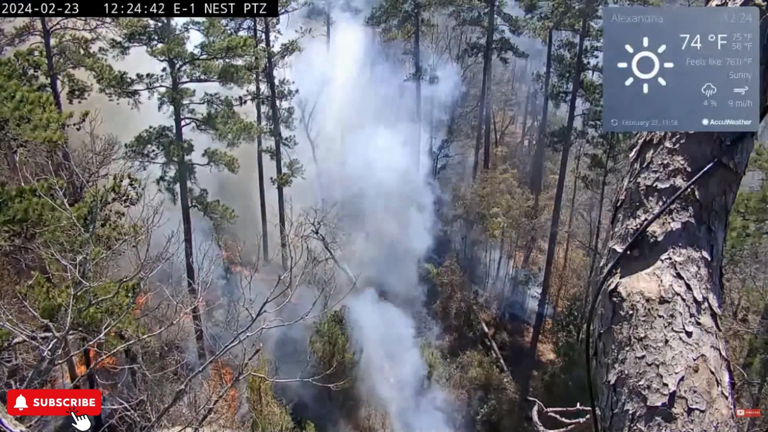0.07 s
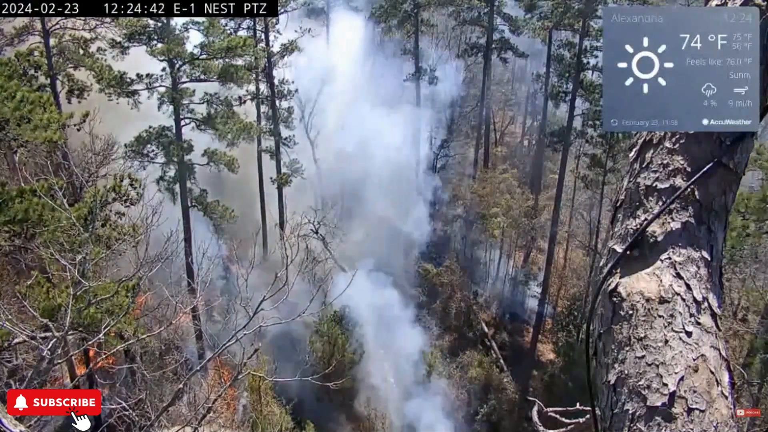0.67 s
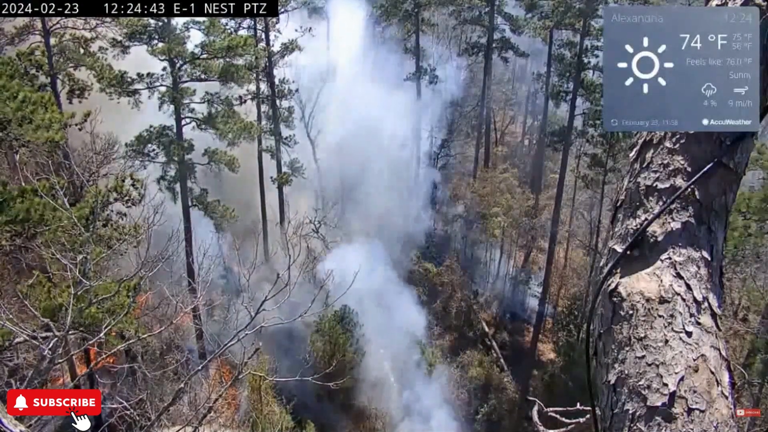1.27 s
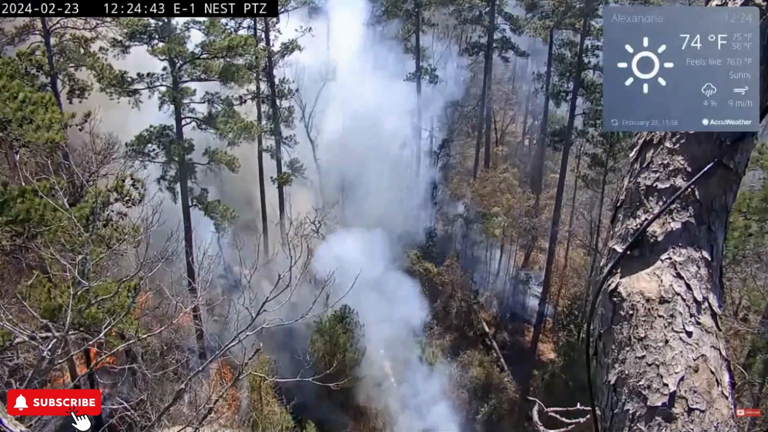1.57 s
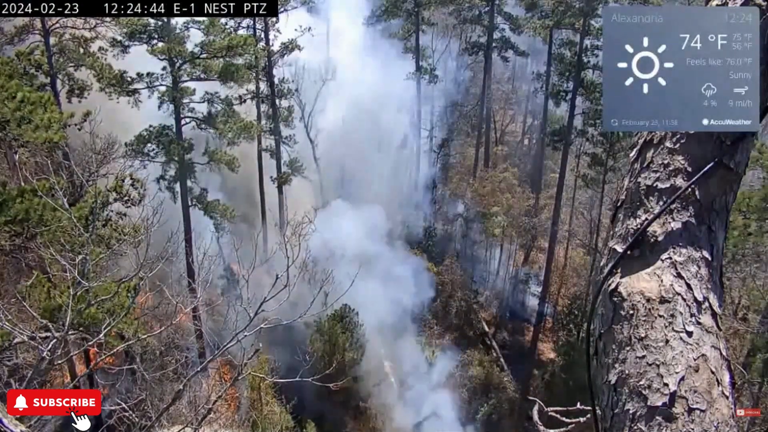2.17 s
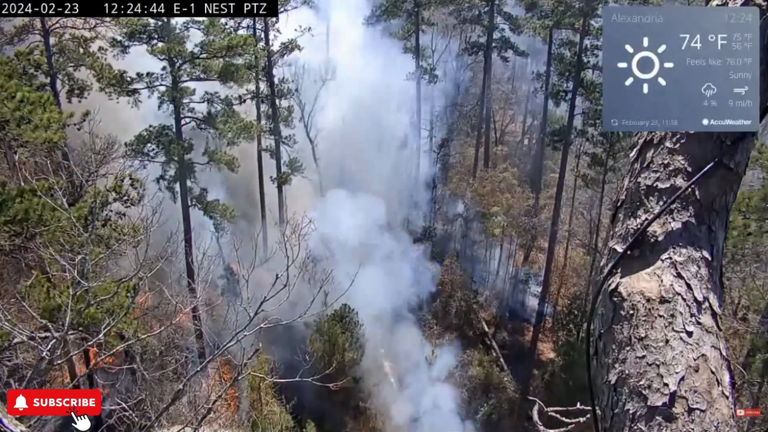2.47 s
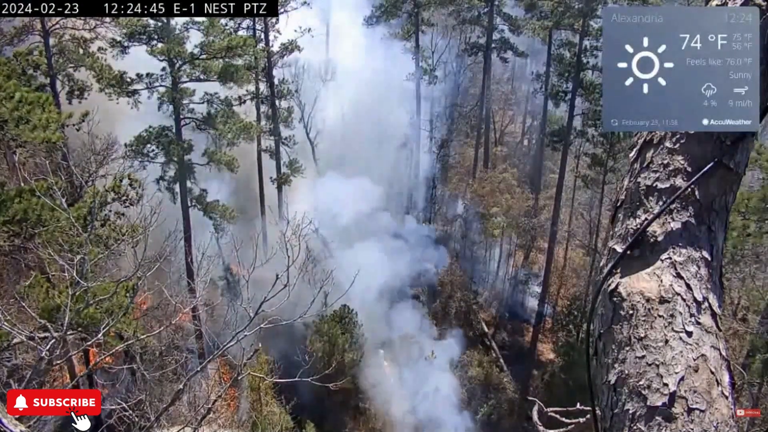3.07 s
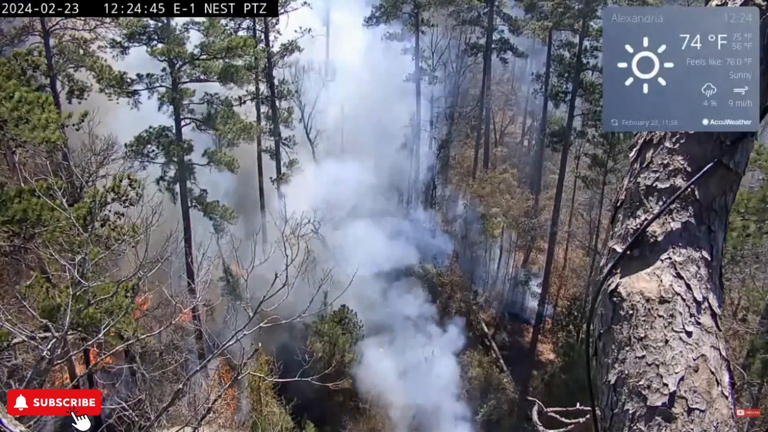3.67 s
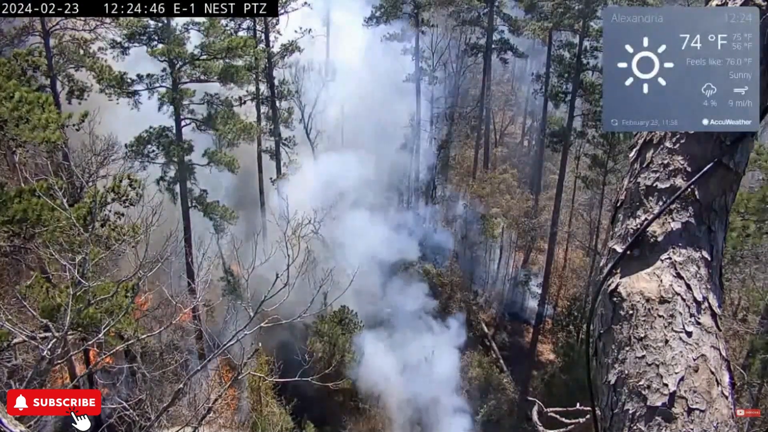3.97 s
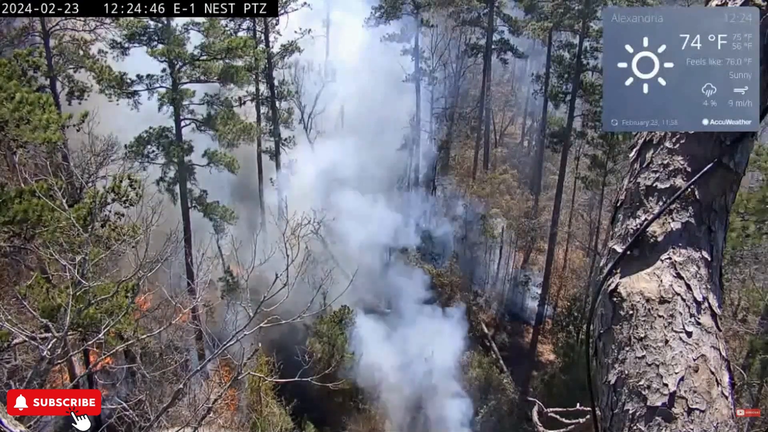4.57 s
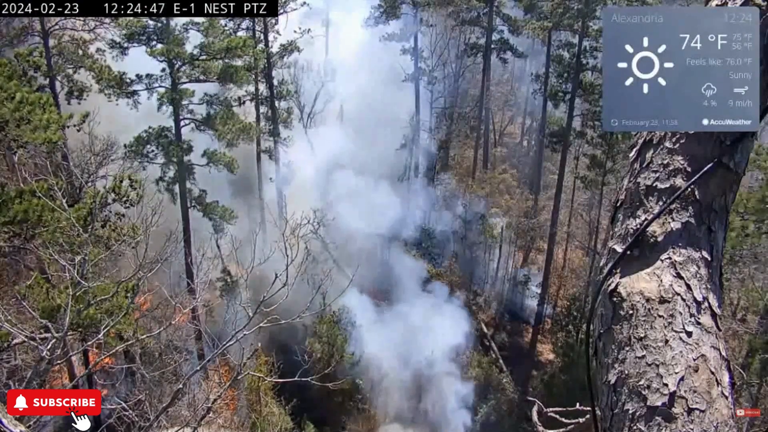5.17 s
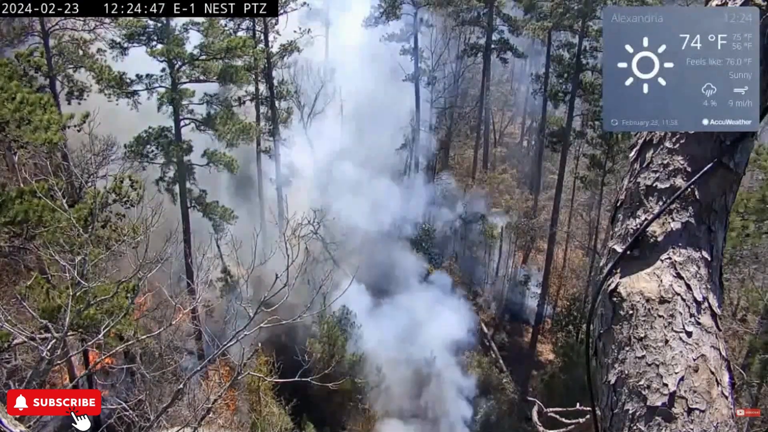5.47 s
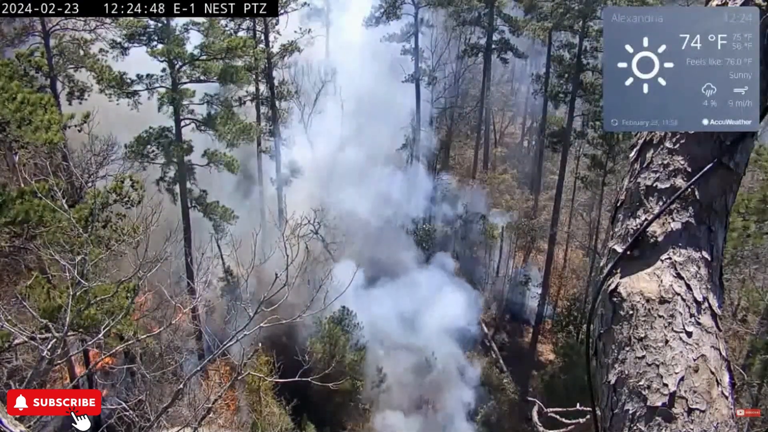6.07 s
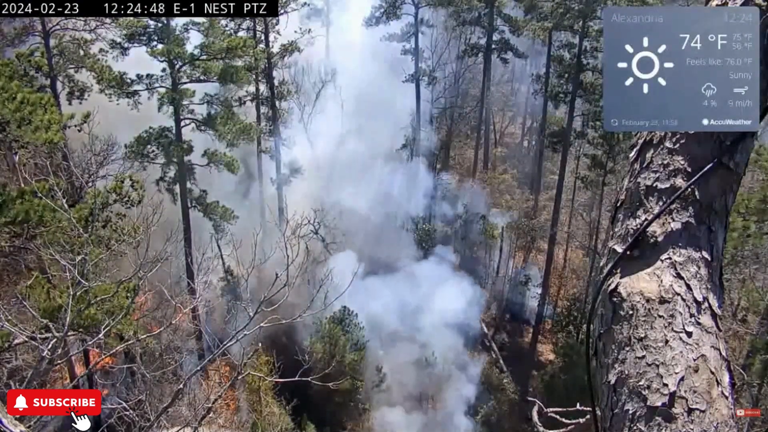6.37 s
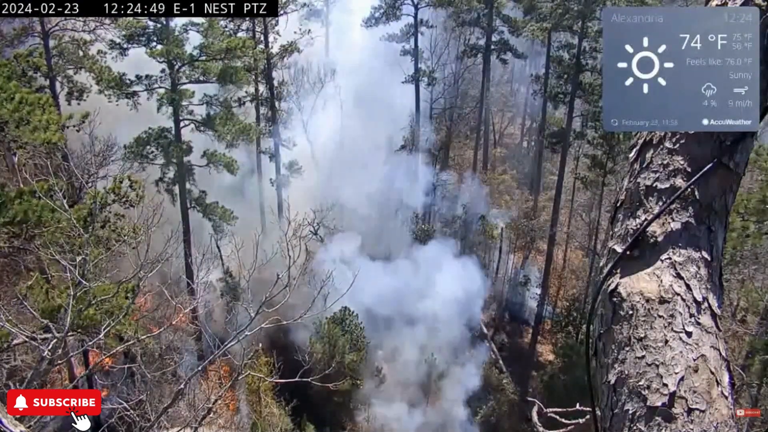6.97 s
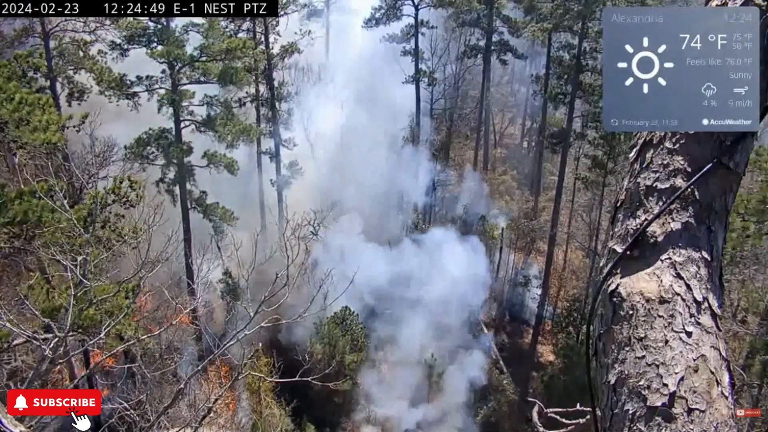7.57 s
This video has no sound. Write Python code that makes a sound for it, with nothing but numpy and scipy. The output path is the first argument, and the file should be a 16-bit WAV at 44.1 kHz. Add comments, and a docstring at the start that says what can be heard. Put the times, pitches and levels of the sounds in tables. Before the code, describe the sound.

A ground fire burns through a pine wood, heard from one fixed outdoor microphone. Needles crackle continuously and twigs split in sharp, irregular pops with a slight echo off the trunks. Beneath lies a steady bed of hiss, rushing air and low wind rumble. Early on, sap steam whistles very faintly and a distant engine drones. The drone sinks midway, just before the biggest pops, and returns near the end.

```python
"""A ground fire creeps through a pine wood, heard from one fixed outdoor microphone.
From the start, steam splits twigs in sharp pops over crackling needles, all scattered by the trunks,
on a bed of hiss, rushing air and the rumble of wind and flames. Early on, sap steam whistles faintly
and a far engine drones. Near 4 s the drone sinks away and the biggest pops land just after;
towards the end a few more tufts flare and the wind brings the drone back."""
import sys
import numpy as np
from scipy import signal
from scipy.fft import rfft, irfft, next_fast_len
from scipy.io import wavfile
from scipy.ndimage import uniform_filter1d

SR = 44100
rng = np.random.default_rng(int(sys.argv[2]) if len(sys.argv) > 2 else 0)


def file_out(sig):
    """Save sig as 16-bit WAV at sys.argv[1]."""
    # one column per channel
    cols = np.atleast_2d(sig).T
    # limit, then scale
    lim = np.clip(cols, -1, 1)
    pcm = np.round(lim * 32767).astype(np.int16)
    wavfile.write(sys.argv[1], SR, pcm)


N = 345303
TIME = np.arange(N) / SR

# foreground pops: t/s, level/dB (over 1 ms, before EQ), ring f/Hz, width/octaves, splinters vs crack/dB
TWIG_POPS = [(.138, -35, 2800, 0.82, -1), (0.2763, -30.5, 7540, 0.55, -5), (0.3107, -31, 2300, 0.46, -3),
             (.5091, -31, 3000, 0.41, -2), (.6211, -30, 5300, 0.65, -4), (0.6749, -25, 3700, 0.31, 0),
             (0.819, -30.5, 2800, 0.34, -4), (.92, -29, 2400, 0.76, 4), (1.0718, -25.5, 5640, 0.57, -6),
             (1.1744, -24.5, 2470, 0.63, -9), (1.2285, -26.5, 3900, .71, -3), (1.6138, -27, 2300, 0.62, 4),
             (1.7697, -27, 3140, .62, 0), (1.9226, -28.5, 4500, 0.74, -3), (1.951, -27, 4000, 0.94, 1),
             (2.1105, -27, 5600, 0.77, -2), (2.1398, -32, 2720, 0.34, -3), (2.2827, -20, 2900, 0.24, -3),
             (2.4268, -26.5, 1300, 0.74, -1), (2.446, -28, 7100, .25, -7), (2.4717, -23.5, 4300, 1, 1),
             (2.4762, -28, 2600, 0.55, 2), (2.6075, -29.5, 4700, 1, -5), (2.8154, -31.5, 5300, 0.54, -4),
             (2.9775, -24, 1100, 0.54, -5), (2.9788, -29, 7560, 0.27, 0), (3.001, -25, 6670, 0.48, -6),
             (3.4226, -26.5, 3480, 0.1, 4), (3.424, -24.5, 6940, 0.14, 4), (3.486, -26.5, 1350, 1, -10),
             (3.6103, -25.5, 2700, 1, 5), (3.7298, -21.5, 3200, 0.56, 5), (3.9894, -25, 1450, 1, -1),
             (4.0219, -27.5, 4800, 0.54, -6), (4.0324, -31.5, 2300, 0.94, -1),
             (4.0517, -26.5, 2290, .81, 3), (4.1124, -24.5, 4040, .32, -13),
             (4.2302, -30.5, 4400, 0.58, -1), (4.257, -29, 4000, 0.63, 1), (4.393, -19.5, 2900, 0.6, -3),
             (4.4, -37, 4000, 0.86, -3), (4.4717, -28, 4430, 0.42, -15), (4.5123, -29, 3900, 0.4, -6),
             (4.557, -28, 3700, 0.51, -2), (4.606, -19, 3600, 0.45, 0), (4.617, -34, 2800, .4, -2),
             (4.6223, -29, 2750, .25, -1), (4.6458, -26.5, 2600, 0.79, 4), (4.6678, -30, 2780, 0.41, 0),
             (4.7365, -35, 3900, .5, -3), (4.813, -22, 2480, 0.52, -2), (4.8884, -23.5, 3000, 0.7, -7),
             (5.0254, -23, 4140, 0.37, -7), (5.2682, -24, 2880, 1, 5), (5.515, -30.5, 3800, .55, -1),
             (5.6074, -27, 3860, 0.2, 0), (5.6263, -23, 4500, 0.92, 3), (5.6371, -28, 4000, 0.54, 1),
             (5.7262, -30, 4000, .6, -7), (5.762, -22, 1940, 0.55, 5), (5.781, -27.5, 2600, 1, 5),
             (6.0742, -30.5, 3200, 0.54, -1), (6.1336, -21, 4300, 0.47, -3), (6.1871, -30, 3900, 0.47, -3),
             (6.2583, -19.5, 1640, 0.58, -8), (6.3844, -33, 2700, 0.17, -2), (6.4144, -24, 2250, 0.58, -7),
             (6.566, -29, 2170, 0.34, -7), (6.749, -32, 4000, .6, 1), (6.809, -25.5, 2390, .7, 1),
             (6.8175, -33, 4100, .7, -2), (6.972, -33, 3600, .5, 0), (6.996, -22, 8050, 0.55, -4),
             (7.2257, -28, 6000, .7, 3), (7.247, -32, 2800, 0.35, -3), (7.253, -31, 2880, 0.24, -2),
             (7.289, -28, 5100, 0.45, 3), (7.5356, -32, 3400, 0.63, -10), (7.667, -32, 5200, 0.54, -3),
             (7.718, -26, 7400, 0.27, -12), (7.7268, -24, 1500, 0.61, 1)]
# tufts of needles catching: t/s, level/dB (before EQ)
TUFT_FLARES = [(.258, -38.5), (1.255, -42), (1.48, -43), (1.715, -40.5), (2.926, -37.5), (5.717, -41.5),
               (5.87, -43), (6.803, -45), (7.241, -46)]
# vigour of the flames, a fader that crackle, rush and hiss partly follow: t/s, level/dB
FLAME_VIGOUR = [(0, 0.5), (1.3, 0.7), (2.3, -1.5), (3.2, -1.8), (4.6, -0.3), (5.2, -1.7), (5.9, -1.5),
                (6.6, 0.5), (7.83, -2)]
# sap steam jets: start t/s, length/s, starting f/Hz, rise/(Hz per s), starting level/dB
STEAM_JETS = [(.18, 0.28, 9560, 3000, -55), (.8, .18, 10150, 600, -60), (2.33, .2, 11550, 1600, -58),
              (3.1, .25, 12250, 1100, -60)]
# EQ of the needle crackle: f/Hz, level/dB
CRACKLE_EQ = [(300, -14), (900, 13), (2400, 4), (4500, 0.5), (8300, 2.5), (12000, 6.5)]
# EQ of the far burn's hiss: f/Hz, level/dB
HISS_EQ = [(800, -28), (1900, -2), (2400, 6), (2750, -2), (3200, 3.5), (4300, 5), (5800, 1), (6700, 4),
           (8500, 1.5), (10000, -2.5), (14000, -3)]
# EQ of the rushing air: f/Hz, level/dB
RUSH_EQ = [(150, -23), (300, -3.5), (480, -0.5), (750, -2.5), (1000, -5.5), (1450, -6.5), (1900, -13),
           (3000, -13), (6000, -35)]
# EQ of the wind and flame rumble: f/Hz, level/dB
RUMBLE_EQ = [(15, -16), (25, -13), (45, -4.5), (65, -1.1), (80, 3), (100, 1), (125, 0.1), (160, -4),
             (200, -9.5), (250, -17), (330, -24.5), (500, -54)]
# gusts riding the rumble: t/s, level/dB
RUMBLE_GUSTS = [(0, -2.3), (1.3, 0.6), (2.4, -2.3), (3.7, -1.4), (4.4, 0), (5.3, -2.2), (5.85, 0.7),
                (6.4, -1.1), (7.83, -0.5)]
# turning rate of the far engine: t/s, f/Hz
ENGINE_RATE = [(0, 20.5), (1.1, 20.46), (1.8, 20.68), (2.5, 20.6), (3.2, 20.66), (4, 20.5), (7.83, 20.28)]
# the drone as the wind carries it: t/s, 4th harmonic level/dB, 5th harmonic level/dB
DRONE_LEVELS = [(0, -39, -40), (.3, -31, -31.5), (.6, -33.5, -29.5), (.9, -35, -31.5), (1.27, -29.5, -36),
                (1.55, -36, -34.5), (1.85, -30.5, -32.5), (2.15, -32, -38), (2.4, -37.5, -36.5),
                (2.75, -44, -32), (3.1, -39, -35), (3.35, -38.5, -30.5), (3.75, -39.5, -32.5),
                (4.2, -59, -42), (6.4, -52, -47), (6.85, -33, -41), (7.35, -49, -51), (7.65, -46, -34.5)]
# treble lost in the air between fire and microphone: f/Hz, level/dB
AIR_EQ = [(8500, -1), (11000, -5.5), (14000, -6)]
# the microphone's dull top end: f/Hz, level/dB
MICROPHONE_EQ = [(8400, 0.5), (9800, -3.5), (11000, -8), (14000, -13), (15000, -32)]


def twig_pops(bass_spread=1.1, mode_ratios=(0.91, 1.09), ring_s=.0011):
    """Pockets of steam split the nearest twigs: some break clean, some splinter and ring."""
    start, db, hz, width, splinter_db = np.transpose(TWIG_POPS)
    width = np.maximum(width, .12)
    cracks = snaps(hz, bass_spread * width, width, splinter_db, splinter_s=.001, skirt_db=-24)
    age = np.arange(cracks.shape[1]) / SR
    bending_modes = sum(np.cos(2 * np.pi * ratio * hz[:, None] * age) for ratio in mode_ratios)
    rings = unit_rows(bending_modes * np.sqrt(age) * np.exp(-age / ring_s))
    ring_db = -9 - 20 * width  # the broader the crack, the less the twig rings
    hits = unit_rows(cracks + undb(ring_db)[:, None] * rings)
    track = place(start, hits * np.sqrt(SR / 1000) * undb(db)[:, None])
    return eq(track, [(200, -27), (660, 0.5)])  # thin wood radiates no bass


def snaps(ring_hz, octaves_below, octaves_above, splinter_db, splinter_s, skirt_db, size=512):
    """Wood breaks: a sharp crack around a ring pitch, then a splinter tail. One unit-energy row a snap."""
    f = np.maximum(np.fft.rfftfreq(size, 1 / SR), 20)
    octaves = np.log2(f / ring_hz[:, None])
    off_pitch = np.maximum(-octaves / octaves_below[:, None], octaves / octaves_above[:, None])
    # the twig's own band stands on the faint, broad skirt of the break itself
    band = np.exp(-(off_pitch / 2) ** 1.5)
    skirt = undb(skirt_db) * f / (f + 1000) / (1 + (f / 9000) ** 4)
    # minimum phase for a hard attack: the whole band starts at once
    cepstrum = irfft(np.log(band + skirt))
    cepstrum[:, 1:size // 2] *= 2
    cepstrum[:, size // 2 + 1:] = 0
    spectrum = np.exp(rfft(cepstrum))
    age = np.arange(size) / SR
    shreds = rng.standard_normal((len(ring_hz), size)) * np.sqrt(age) * np.exp(-age / splinter_s)
    crack = unit_rows(irfft(spectrum))
    splinters = unit_rows(irfft(spectrum * rfft(shreds)))
    return unit_rows(crack + undb(splinter_db)[:, None] * splinters)


def tuft_flares(centre_hz=3530, width_octaves=0.72, run_s=.021, ticks_each=7):
    """A tuft catches: a quick run of soft, splintery ticks."""
    breadth, pitch, lag = rng.random((len(TUFT_FLARES) * ticks_each, 3)).T
    start, db = np.repeat(TUFT_FLARES, ticks_each, axis=0).T
    hz = centre_hz * 2 ** (pitch - .5)
    width = width_octaves * (.5 + breadth)
    ticks = snaps(hz, width, width, splinter_db=np.full(len(hz), 4.), splinter_s=0.0022, skirt_db=-36)
    gain = undb(db) * np.sqrt(run_s * SR / ticks_each)
    return place(start + run_s * lag, ticks * gain[:, None])


def needle_crackle(scatter_db=7.5, ceiling_db=18, centre_hz=2610, range_octaves=1.76, count=5200):
    """Needles burst all over the fire in flurries: many tiny ticks, few big ones, each at its own pitch."""
    when, rank, pitch, breadth, shred = rng.random((count, 5)).T
    octaves = range_octaves * (2 * np.sqrt(pitch) - 1)  # high ticks are the commonest
    flurry_db = .7 * np.tanh(drift(30))[(when * N).astype(int)]
    gain = undb(flurry_db - scatter_db * np.log(1 - rank))
    ceiling = undb(ceiling_db + 8 * np.minimum(octaves, .5))  # low ticks come from afar and stay softer
    gain = ceiling * np.tanh(gain / ceiling)  # a needle holds only so much steam
    width = 0.35 * (.5 + breadth)
    splinter_db = 4.5 + 10 * (shred - .5)
    ticks = snaps(centre_hz * 2 ** octaves, width, width, splinter_db, splinter_s=0.0014, skirt_db=-20)
    return unit_rms(eq(place(when * N / SR, ticks * gain[:, None]), CRACKLE_EQ))


def trunk_echoes(x, wet_db, t60_s, count=90):
    """Trunks and ground add a thin spray of echoes to the direct sound."""
    delay_s = .004 + .16 * rng.random(count) ** 2
    taps = rng.standard_normal(count) * np.exp(-np.log(1000) * delay_s / t60_s)
    response = np.bincount((delay_s * SR).astype(int), taps)
    return x + undb(wet_db) * signal.fftconvolve(x, response / np.linalg.norm(response))[:N]


def steam_whistles(wobble_depth_hz=169, edge_s=.04, fade_db_per_s=12):
    """Sap steam squeezes out of split stems in thin, unsteady jets; each climbs in pitch as it fades."""
    wobble_hz = wobble_depth_hz * drift(900)
    flutter_db = 3 * drift(90)
    track = np.zeros(N)
    for start, length, hz, rise, db in STEAM_JETS:
        age = np.clip(TIME - start, 0, length)
        gate = np.clip(np.minimum(age, length - age) / edge_s, 0, 1)
        phase = 2 * np.pi * np.cumsum(hz + rise * age + wobble_hz) / SR
        track += gate * undb(db - fade_db_per_s * age + flutter_db) * np.sqrt(2) * np.sin(phase)
    return track


def turbulence(curve, db, flutter_db, flutter_hz):
    """Churning air: a noise bed shaped by an EQ curve, its level fluttering."""
    bed = unit_rms(eq(rng.standard_normal(N), curve))
    return bed * undb(db + flutter_db * drift(flutter_hz))


def far_engine(harmonics=(4, 5), rate_wander=0.00048, waver_db=0.6):
    """Only two low harmonics of the turning rate carry this far; each swells and sinks in the wind."""
    rate_hz = automation(ENGINE_RATE) * (1 + rate_wander * drift(1.82))
    turn = 2 * np.pi * np.cumsum(rate_hz) / SR
    times, *levels = np.transpose(DRONE_LEVELS)
    drone = np.zeros(N)
    for harmonic, db in zip(harmonics, levels):
        swell = undb(np.interp(TIME, times, db) + waver_db * drift(3.04))
        drone += np.sqrt(2) * swell * np.sin(harmonic * turn + 2 * np.pi * rng.random())
    return drone


def undb(db):
    """Decibels to gain."""
    return 10 ** (np.asarray(db) / 20)


def unit_rms(x):
    """Normalise to rms 1."""
    return x / np.sqrt(np.mean(x ** 2))


def unit_rows(x):
    """Normalise each row to energy 1."""
    return x / np.linalg.norm(x, axis=1, keepdims=True)


def eq(x, curve):
    """Filter through a curve of f/Hz, level/dB points."""
    hz, db = np.transpose(curve)
    size = next_fast_len(N)
    f = np.maximum(np.fft.rfftfreq(size, 1 / SR), 1)
    gain = undb(np.interp(np.log(f), np.log(hz), db))
    return irfft(rfft(x, size) * gain, size)[:N]


def automation(points):
    """Straight ramps between t/s, value points."""
    return np.interp(TIME, *np.transpose(points))


def drift(rate_hz):
    """Random modulator: sample-and-hold, slewed twice, at rms 1."""
    hold = max(int(SR / rate_hz), 2)
    steps = np.repeat(rng.standard_normal(N // hold + 1), hold)
    return unit_rms(uniform_filter1d(uniform_filter1d(steps, hold), hold)[:N])


def place(times, hits):
    """Lay each row on the timeline at its time in seconds."""
    index = (times * SR).astype(int)[:, None] + np.arange(hits.shape[1])
    return np.bincount(index.ravel(), hits.ravel(), N)[:N]


def scene():
    """Mono mix: pops and crackle among the trunks up front; whistles, air beds and engine behind."""
    vigour_db = automation(FLAME_VIGOUR)
    rumble = turbulence(RUMBLE_EQ, -30 + automation(RUMBLE_GUSTS), flutter_db=0.5, flutter_hz=6.4)
    rush = turbulence(RUSH_EQ, -45 + 0.76 * vigour_db, flutter_db=0.98, flutter_hz=60)
    hiss = turbulence(HISS_EQ, -46 + 0.28 * vigour_db, flutter_db=1.63, flutter_hz=100)
    crackle = undb(-45.5 + 0.28 * vigour_db) * needle_crackle()
    bursts = eq(twig_pops() + tuft_flares() + crackle, AIR_EQ)
    foreground = trunk_echoes(bursts, wet_db=-10, t60_s=0.21)
    mono = foreground + steam_whistles() + hiss + rush + rumble + far_engine()
    return np.array([mono, mono])


def record(dry):
    """The camera's microphone dulls the treble, and a steep low-pass cuts the top."""
    dull = np.array([eq(channel, MICROPHONE_EQ) for channel in dry])
    high_cut = signal.ellip(8, .2, 70, 14600, fs=SR, output="sos")
    return signal.sosfilt(high_cut, dull)


dry = scene()
out = record(dry)
file_out(out)
```